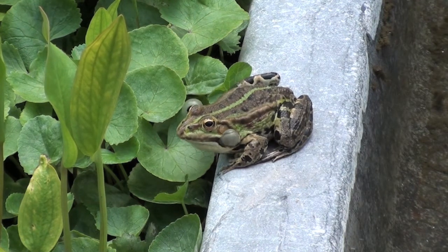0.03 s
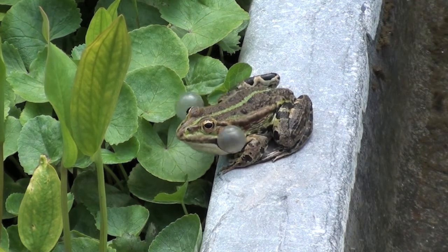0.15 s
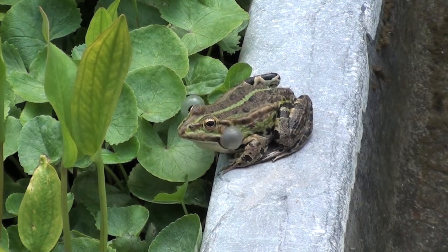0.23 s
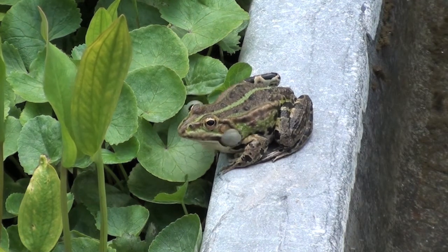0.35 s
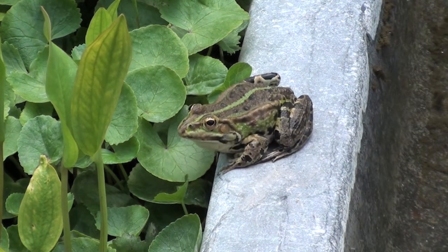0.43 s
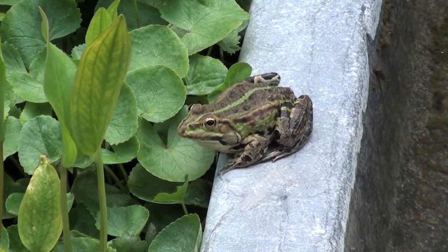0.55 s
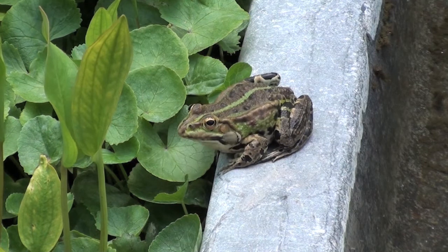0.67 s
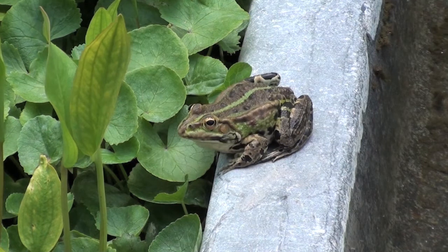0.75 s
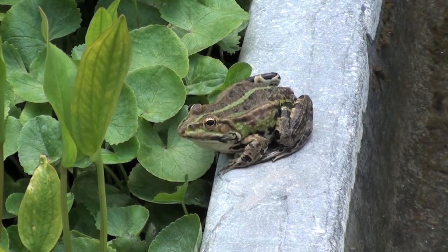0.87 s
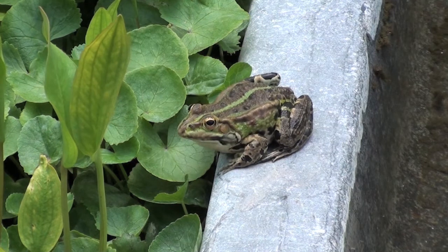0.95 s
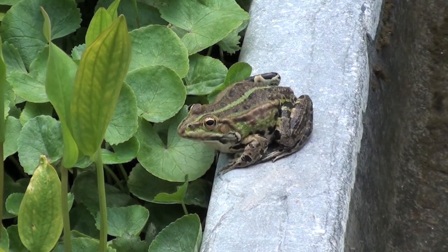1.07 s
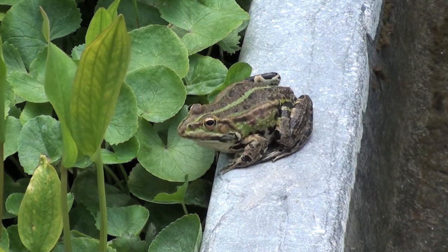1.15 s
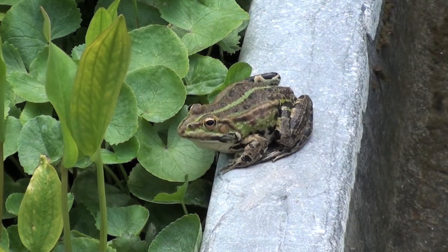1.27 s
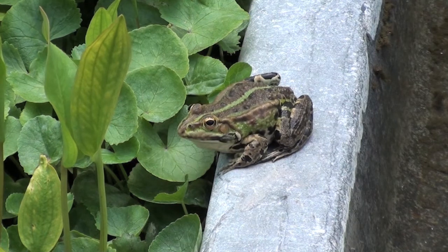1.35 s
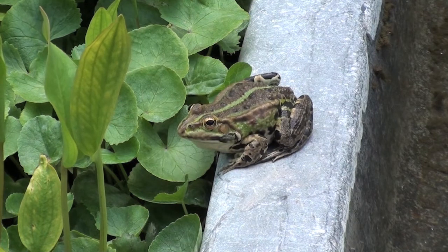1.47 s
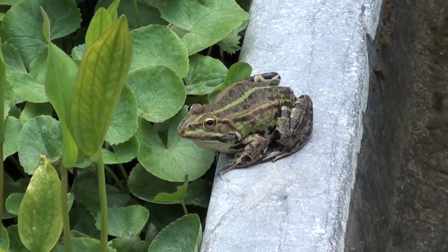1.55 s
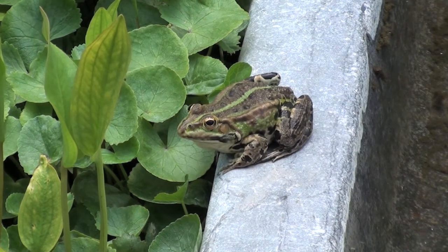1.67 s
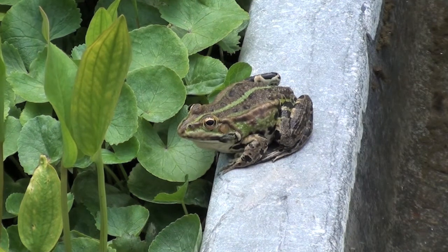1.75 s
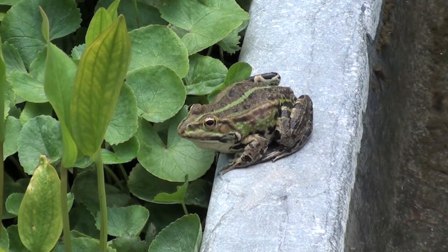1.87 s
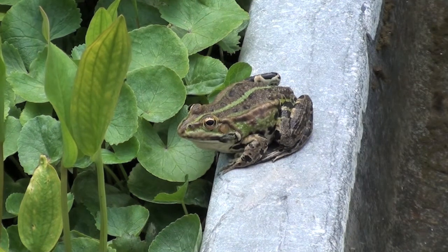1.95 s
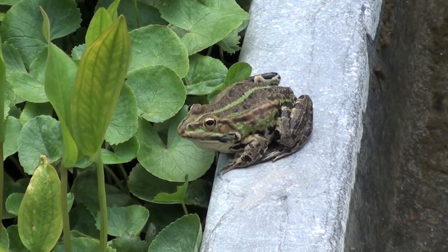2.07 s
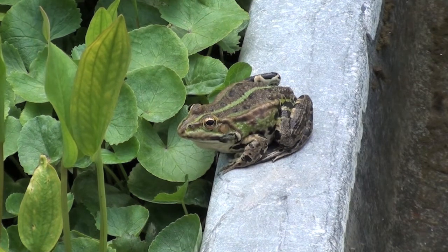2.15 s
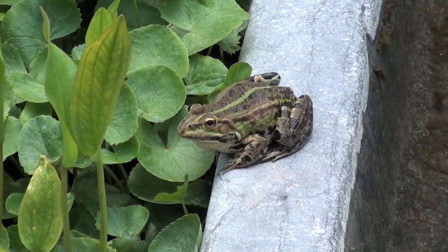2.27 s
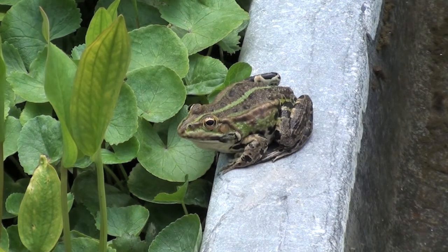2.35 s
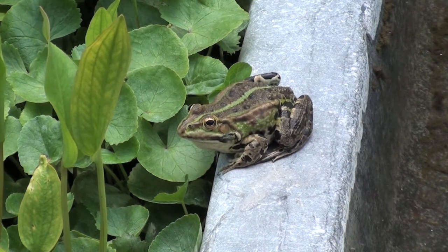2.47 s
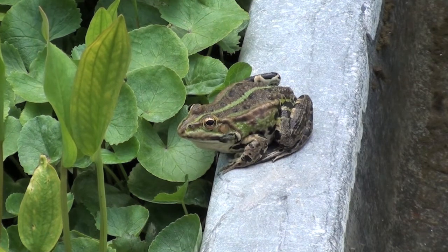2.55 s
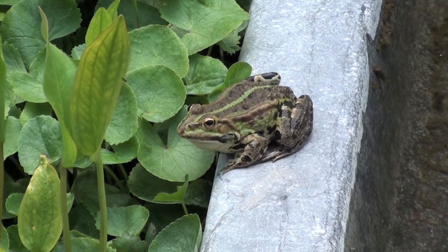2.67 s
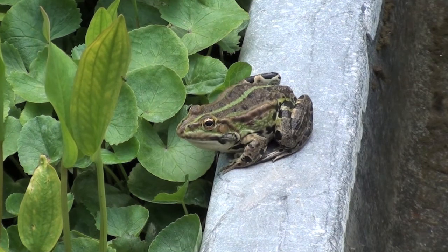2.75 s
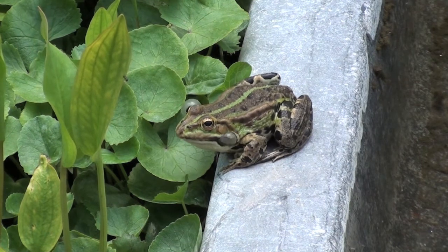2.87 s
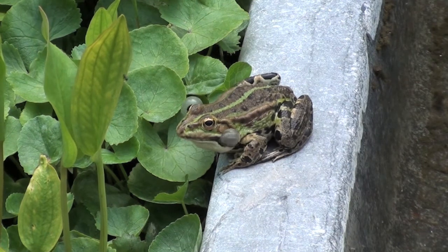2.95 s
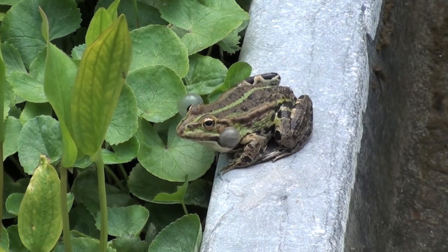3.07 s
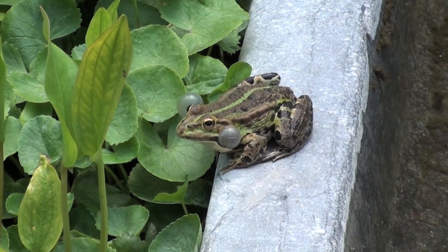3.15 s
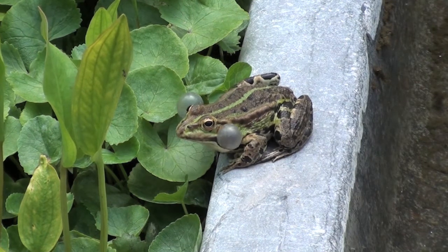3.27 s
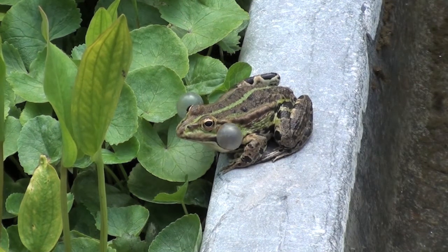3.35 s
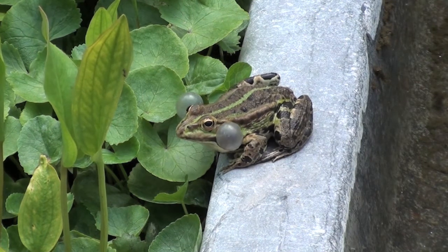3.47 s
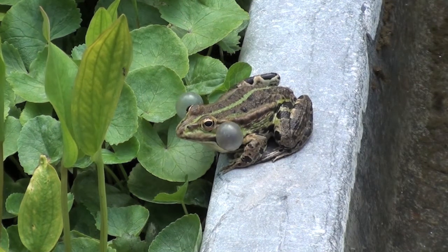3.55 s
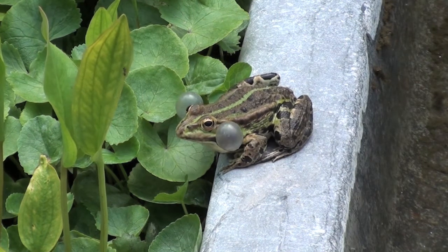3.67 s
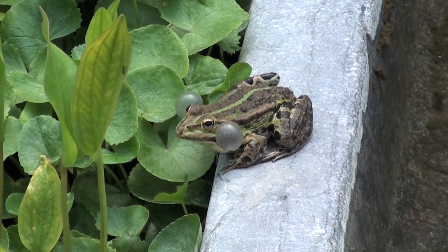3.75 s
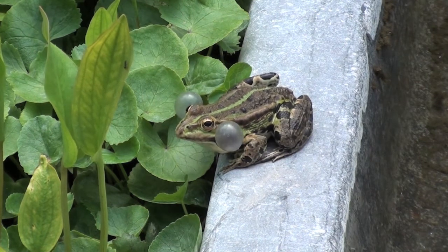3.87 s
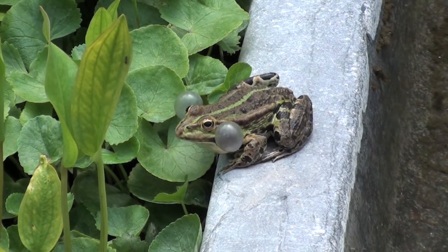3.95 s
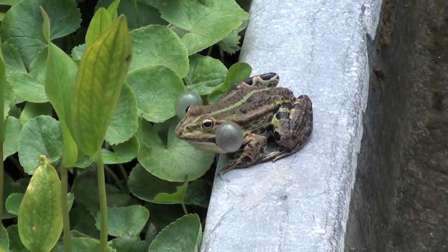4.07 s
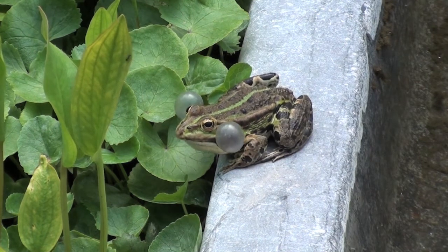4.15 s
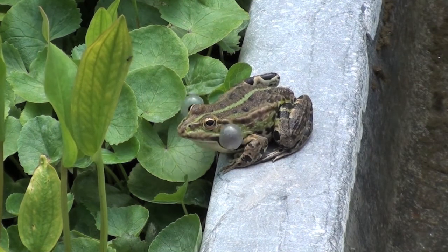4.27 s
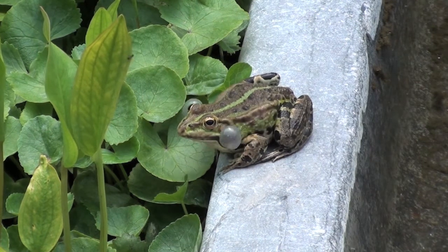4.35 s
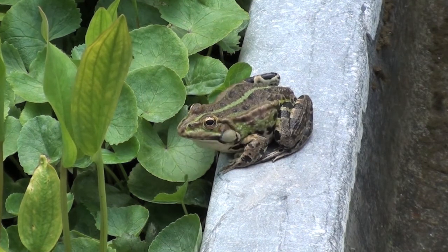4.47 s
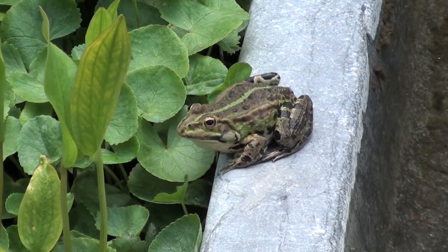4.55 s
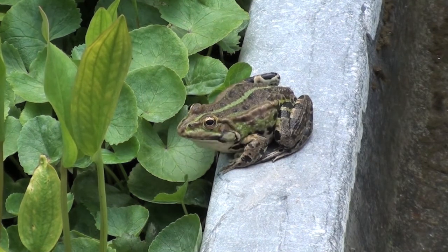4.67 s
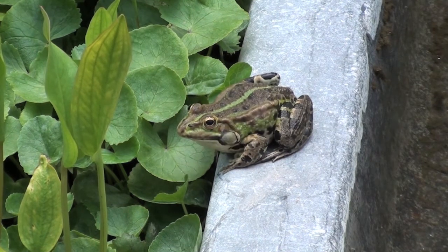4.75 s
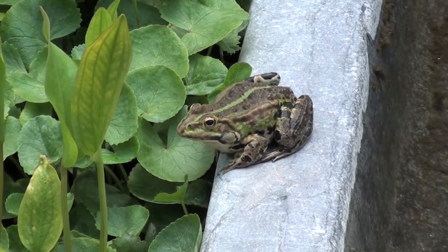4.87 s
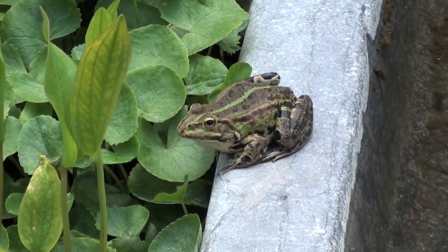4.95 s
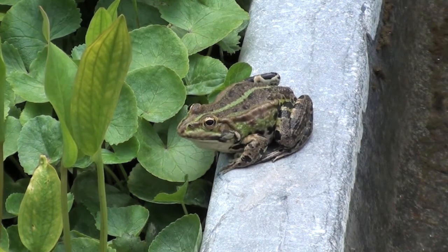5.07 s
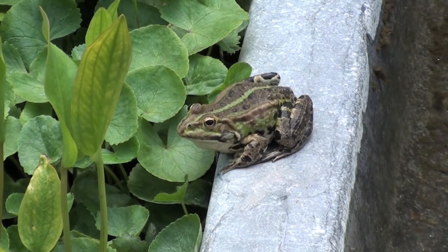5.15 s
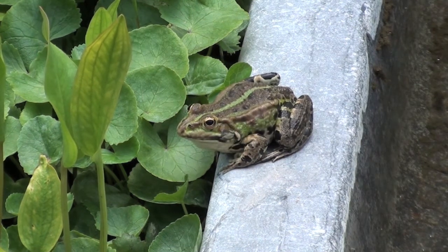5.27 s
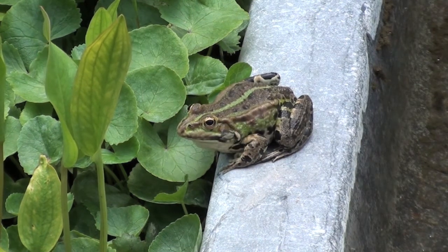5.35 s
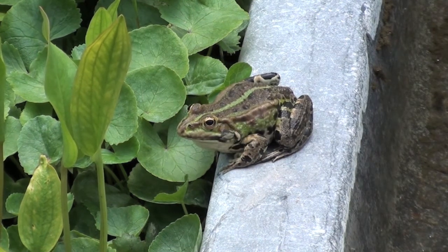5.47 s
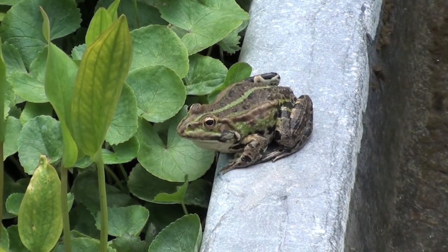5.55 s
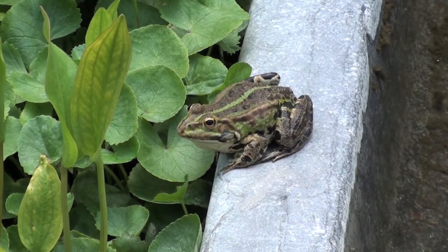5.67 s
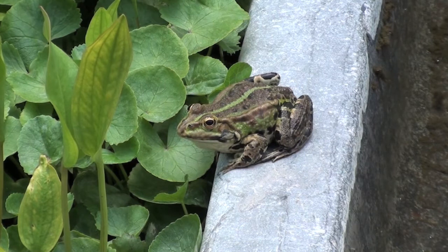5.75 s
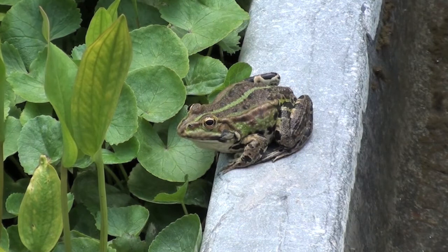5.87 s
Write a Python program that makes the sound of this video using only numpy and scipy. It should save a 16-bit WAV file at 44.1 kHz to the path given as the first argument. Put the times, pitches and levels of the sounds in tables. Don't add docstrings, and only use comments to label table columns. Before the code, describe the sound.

Outdoor pond edge in stereo, with low distant hum, hiss and very faint birds. One frog, near and centred, makes a brief rising croak, later accelerating clicks into a hard, bright rattle of over a second. Another frog, farther off to the left and more reverberant, rattles before, during the quiet gap and after it. Two small throaty grunts close the scene. Hard walls give quick slaps and short reverberation.

```python
import sys
import numpy as np
from scipy import signal
from scipy.fft import rfft, irfft, next_fast_len
from scipy.io import wavfile
from scipy.ndimage import uniform_filter1d, minimum_filter1d

SR = 44100
rng = np.random.default_rng(int(sys.argv[2]) if len(sys.argv) > 2 else 0)


def gain_from_decibels(decibels):
    exponent = np.asarray(decibels, float) / 20
    return 10 ** exponent


def materialize(psi):
    bounded = np.clip(np.atleast_2d(psi).T, -1, 1)
    quanta = np.round(bounded * 32767).astype(np.int16)
    wavfile.write(sys.argv[1], SR, quanta)


N = 260631

# (pitch_hz, width_hz, level_db)
THROAT_HOLLOWS = [(651, 64, -1), (819, 68, -1.5), (1017, 293, 2.5), (1263, 56, -4), (1500, 26, -36),
                  (510, 180, -6.5)]


def along(points, hz):
    f, v = np.transpose(points)
    return np.interp(np.log(hz + 1), np.log(f + 1), v)


def filtered(x, response):
    m = next_fast_len(N + SR // 2)
    return irfft(rfft(x, m) * response(np.fft.rfftfreq(m, 1 / SR)), m)[..., :N]


def blunt(f, top_hz):
    return 1 / (1 + 1.3j * f / top_hz - (f / top_hz) ** 2)


def modes(table):
    def response(f):
        total = 0
        for k, (hz, width_hz, db) in enumerate(table):
            ring = 1j * f * SR / (2 * np.pi) / (hz * hz - f * f + 1j * f * width_hz)
            total = total + (-1) ** k * gain_from_decibels(db) * ring
        return total
    return response


def clicks(s, db):
    return np.bincount(np.round(s * SR).astype(int), gain_from_decibels(db), N)[:N]


def rings(s, hz, db, rise_s, t60_s):
    t = np.arange(int(np.max(t60_s) * SR)) / SR
    swell = (1 - np.exp(-t / np.c_[rise_s])) ** 2
    fade = gain_from_decibels(np.c_[db] - 60 * t / np.c_[t60_s])
    tone = np.sin(2 * np.pi * np.c_[hz] * t)
    at = np.round(s * SR).astype(int)[:, None] + np.arange(len(t))
    return np.bincount(at.ravel(), (swell * fade * tone).ravel(), N)[:N]


def tones(rows):
    s, hz, db, rise_ms, t60_ms = np.transpose(rows)
    return rings(s, hz, db + 14.5, rise_ms / 1000, t60_ms / 1000)


def burst_pulses(rows, step_ms, count):
    s, db, gap_ms, close_db, slope_db = np.transpose(rows)
    back = np.arange(count)
    luck = rng.standard_normal((len(s), 2, count)) * (back > 0)
    lead_s = s[:, None] - back * step_ms / 1000 + .00025 * luck[:, 0]
    drop_db = slope_db[:, None] * np.minimum(back, 2.2) ** .75
    lead_db = db[:, None] - drop_db + .8 * luck[:, 1]
    return np.append(lead_s, s + gap_ms / 1000), np.append(lead_db, db + close_db)


def croak_pulses(rows):
    s, rate, db = np.transpose(rows)
    t = np.arange(s[0], s[-1], 1 / SR)
    turns = np.cumsum(np.interp(t, s, rate)) / SR
    at = np.interp(np.arange(int(turns[-1]) + 1), turns, t)
    luck = rng.standard_normal((len(at), 2))
    return at + 0.00017 * luck[:, 0], np.interp(at, s, db) + 0.65 * luck[:, 1]


def air():
    # (pitch_hz, level_db per Hz)
    colour = [(15, -44), (30, -11), (195, -2), (620, -6), (1070, -7), (1900, -9.5), (3300, -13.5),
              (15900, -20.5)]
    # (pitch_hz, likeness 0 to 1)
    alike = [(30, 0.996), (100, 1), (290, 0.82), (640, 0.37), (1410, 0.3), (3100, 0.46), (6820, 0.9),
             (9000, 0.99)]
    z = signal.stft(rng.standard_normal((2, N)), nperseg=512)[2]
    patches = uniform_filter1d(rng.standard_normal(z.shape[1:]), 5, axis=0)
    patches = uniform_filter1d(patches, 14, axis=1)
    pair = signal.istft(z * gain_from_decibels(0.81 * patches / patches.std()), nperseg=512)[1][:, :N]

    def mid_and_side(f):
        turn = np.arccos(np.clip(along(alike, f), -1, 1)) / 2
        return gain_from_decibels(along(colour, f)) * [np.cos(turn), np.sin(turn)]

    mid, side = filtered(pair, mid_and_side)
    return gain_from_decibels(-53) / mid.std() * np.array([mid + side, mid - side])


def birds():
    # (start_s, pitch_hz, peak_db, rise_ms, t60_ms)
    calls = [(.003, 7150, -48.5, 1.7, 19), (2.325, 5600, -56, 15, 110), (4.01, 479, -46.5, 42, 360),
             (4.12, 461, -56, 24, 490), (4.27, 413, -44, 39.5, 190), (4.86, 6620, -53, 12.2, 86),
             (5.0, 6500, -60, 15, 110), (5.055, 6560, -54, 12, 81), (5.14, 6750, -60, 20, 160),
             (5.36, 6360, -64, 36, 170), (5.8, 2060, -61, 35, 240)]
    return tones(calls)


def frog_pulses():
    # (time_s, pulses per s, peak_db)
    croaks = [
        [(.004, 198, -39.5), (.06, 205, -26.5), (.105, 253, -15.5), (.145, 225, -9.5), (.187, 188, -10.5),
         (.197, 316, -8.5), (.206, 310, -5), (.213, 280, -10), (.24, 230, -18)],
        [(2.9763, 165, -21), (3.0, 150, -29), (3.02, 150, -23), (3.045, 225, -35)],
        [(4.2168, 260, -13), (4.232, 259, -7), (4.2445, 340, -16)],
    ]
    # (start_s, peak_db)
    lone_clicks = [(2.684, -44), (2.798, -36), (2.874, -29), (2.913, -25), (2.9235, -21), (2.9445, -20),
                   (2.9545, -20), (2.967, -21), (3.0845, -24), (4.2045, -9), (4.212, -13)]
    # (strong pulse start_s, peak_db, gap to closing pulse in ms, closing pulse over strong in dB)
    rattle = [(3.068, -20, 5.2, -1), (3.107, -20, 6, -1), (3.154, -21, 5.9, 1), (3.195, -17, 6.8, 0),
              (3.237, -15, 10.4, -4), (3.2825, -13, 10, -12), (3.3225, -13, 10.9, -5), (3.363, -15, 6.4, 2),
              (3.4055, -11, 9.2, 0), (3.453, -10, 8, -9), (3.493, -8, 11.1, -8), (3.537, -9, 12.8, -6),
              (3.579, -7, 10, -12), (3.624, -7, 8, -9), (3.6645, -6, 10, -1), (3.705, -8, 6.9, 2),
              (3.750, -10, 7.8, 4), (3.7935, -7, 9.3, 1), (3.8355, -7, 7.5, 0), (3.8805, -7, 7.2, 1),
              (3.924, -6, 7.3, 0), (3.9675, -6, 7.4, 0), (4.0105, -10, 6.3, 4), (4.0535, -7, 6.7, 2),
              (4.101, -8, 6.1, 2), (4.145, -7, 6.1, 1), (4.188, -5, 6, -2)]
    strong_s, strong_db = np.transpose(rattle)[:2]
    slope_db = 6.5 + 0.19 * strong_db
    open_ms = np.minimum(8.3 + 1.3 * (strong_db + 21), 13)
    opens = strong_s - open_ms / 1000
    pulses = np.array(burst_pulses(np.c_[rattle, slope_db], step_ms=4.4, count=4))
    burst = np.minimum(np.searchsorted(strong_s, pulses[0] - .002), len(opens) - 1)
    early = (pulses[0] < opens[burst] - .001) & (pulses[0] > opens[burst] - .006)
    parts = [pulses[:, ~early], np.transpose(lone_clicks)]
    s, db = np.hstack(parts + [croak_pulses(c) for c in croaks])
    return s - .0004, db, opens, strong_db


def frog_skin(s, db, skin_hz, skin_db, throat_db):
    # (multiple of the group's pitch, level_db, t60_ms)
    skin_rings = [
        [(1, 1.5, 5.76), (.995, -13, 32), (.86, -8.5, 19.6), (1.11, -27, 55), (1.25, -7, 3.5), (1.42, -54, 4.9)],
        [(1.59, -9.5, 17), (1.75, -11.5, 5.7)],
        [(2.22, -9.5, 12.4), (2.52, 3, 7.8)],
    ]
    # (time_s, pitch ratio)
    squeak_drift = [(3.2, 1.05), (3.6, 1.02), (4.0, 1), (4.22, 1.01)]
    whistle_db = 8 + 3.9 * skin_db
    squeak_db = -28 - 0.0039 * np.maximum(skin_hz - 4690, 0) - 1.3 * (throat_db + 16)
    squeak_hz = 4620 * np.interp(s, *np.transpose(squeak_drift))
    one = np.ones(len(s))
    out = np.zeros(N)
    pitches, levels = (skin_hz, skin_hz, squeak_hz), (skin_db, whistle_db, squeak_db)
    for group, group_db, pitch in zip(skin_rings, levels, pitches):
        for ratio, level_db, t60_ms in group:
            luck = rng.standard_normal((len(s), 2))
            hz = ratio * pitch * (1 + .009 * luck[:, 0])
            size_db = db + group_db + level_db + 0.73 * luck[:, 1]
            out = out + rings(s, hz, size_db, 0.00041 * one, t60_ms / 1000 * one)
    return out


def frog():
    # (time_s, sac pitch_hz, skin pitch_hz, throat_db, skin_db), both dB over the sac
    swelling = [
        [(0, 1350, 5640, 11, -0.5), (.048, 1370, 5300, 8, -18), (.098, 1790, 5050, -0.5, -14.5),
         (.15, 2070, 5030, -10.5, -7), (.2, 2010, 4720, -12.5, -8), (.218, 2060, 4830, 0.5, -45),
         (.25, 1960, 4870, -3.5, -49)],
        [(2.68, 2280, 5300, 6.5, -47), (2.875, 2050, 5220, 12, -23), (2.925, 2030, 5300, 6.5, -13.5),
         (2.97, 1740, 5060, 4, -10), (3.02, 1930, 4950, -2, -27)],
        [(3.11, 2170, 4680, -8, -21), (3.22, 2475, 4700, -11, -14.5), (3.34, 2670, 4560, -11, -11.5),
         (3.45, 2760, 4550, -14.5, -11.5), (3.9, 2674, 4690, -17.5, -8.5), (4.2, 2370, 4727, -19, -7.5),
         (4.223, 2180, 4670, -6, -8.5), (4.245, 2170, 4800, -7, -26)],
    ]
    # (pitch_hz, width_hz, level_db)
    ledge = [(1855, 40, -5), (3340, 60, -5), (3660, 70, -10), (3950, 60, -9)]
    soft_hz = 4500
    s, db, opens, strong_db = frog_pulses()
    when, *columns = np.vstack(swelling).T
    sac_hz, skin_hz, throat_db, skin_db = (np.interp(s, when, c) for c in columns)
    pitch_luck, fade_luck, throat_luck, skin_luck = rng.standard_normal((4, len(s)))
    one, each = np.ones(len(s)), np.ones(len(opens))

    sac = rings(s, sac_hz * (1 + .04 * pitch_luck), db + 3, .0001 * one, .0078 * gain_from_decibels(fade_luck))
    snap_db = -1.5 + 0.54 * db
    snap = rings(s, 1.15 * sac_hz, db + snap_db, .00008 * one, .0025 * one)
    hum_hz = 1.06 * np.interp(opens, when, columns[0])
    hum = rings(opens, hum_hz, -20 + 0.3 * strong_db, 0.0008 * each, 0.038 * each)
    out = filtered(hum - sac - snap, lambda f: blunt(f, soft_hz))

    throat_pulses = clicks(s, db + throat_db - 8.5 + throat_luck)
    out = out - filtered(throat_pulses, lambda f: modes(THROAT_HOLLOWS)(f) / (1 + 1j * f / 2500))
    out = out + filtered(clicks(s, db + skin_db - 11.5 + 2 * skin_luck), modes(ledge))
    out = filtered(out, lambda f: blunt(f, 1.01 * soft_hz))
    out = out + frog_skin(s, db, skin_hz, skin_db, throat_db)

    def small_body(f):
        x = f / 580
        return ((1j * x) ** 2 / (1 + 1.1j * x - x ** 2)) ** 3

    return filtered(out, small_body)


def wall_echoes(x):
    # (delay_ms, level_db)
    walls = [(3.8, -12), (8.1, -9.5), (13, -37), (19, -17.5)]
    return filtered(x, lambda f: sum(gain_from_decibels(db) * np.exp(-2j * np.pi * f * ms / 1000) for ms, db in walls))


def pond(x, count=24):
    # (pitch_hz, t60_s)
    fading = [(400, 0.36), (1000, 0.43), (2200, 0.33), (5000, 0.37), (9000, 0.31)]
    # (pitch_hz, share of left-right difference)
    width = [(500, 0.11), (2500, 0.3), (5000, 0.028), (8000, 0.054), (12000, .04)]
    out, step = np.zeros((2, N + SR)), N // count + 1
    for start in range(0, N, step):
        hz, t, z = signal.stft(rng.standard_normal((2, SR // 2)), SR, nperseg=256)
        z[1] *= along(width, hz)[:, None]
        fade = gain_from_decibels(-60 * t / along(fading, hz)[:, None])
        mid, side = signal.istft(z * fade, SR, nperseg=256)[1]
        tail = np.array([mid + side, mid - side]) / np.linalg.norm(mid)
        wet = signal.fftconvolve(x[None, start:start + step], tail, axes=1)
        out[:, start + 300:][:, :wet.shape[1]] += wet
    return out[:, :N]


def neighbour():
    # (first burst start_s, end_s, gap between bursts in ms)
    rattles = [
        (.279, 1.28, 40.5),
        (1.523, 2.76, 41.1),
        (4.3, 5.4, 39.7),
    ]
    # (time_s, peak_db, sac pitch_hz, skin_db over the sac)
    calls = [
        [(.3, -25.5, 2041, -12), (.65, -27.5, 2430, -3.5), (.95, -28.5, 2170, -1.5), (1.01, -24, 2310, -9.5),
         (1.06, -35.5, 2380, -10), (1.17, -42, 2050, -8), (1.27, -47, 2100, -16)],
        [(1.3, -31, 2460, -8), (1.5, -34, 2290, -11), (1.53, -29.5, 2530, -5.5), (2.0, -29, 2494, -3.5),
         (2.19, -26, 2205, -7.5), (2.27, -43.5, 2270, -27), (2.45, -39, 2330, -28), (2.6, -51, 2200, -28),
         (2.75, -47, 2260, -29)],
        [(4.3, -29.5, 2527, -3.5), (4.8, -31.5, 2475, 0), (5.088, -27.5, 2500, -3), (5.14, -23.5, 2150, -9.5),
         (5.18, -30, 2300, -17), (5.27, -44, 2260, -10), (5.4, -55, 2300, -9)],
    ]
    # (start_s, peak_db)
    opening_clicks = [(1.2999, -36.5), (1.3783, -34), (1.4152, -34), (1.4518, -32.5), (1.4838, -35.5),
                      (1.5187, -35)]
    # (pitch_hz, width_hz, level_db)
    low_skin = [(1690, 160, -28), (3230, 490, -9.5), (3984, 183, -5.5)]
    when, effort_db, sac_hz, skin_db = np.vstack(calls).T
    s = np.hstack([np.arange(first, end, gap_ms / 1000) for first, end, gap_ms in rattles])
    luck = rng.standard_normal((len(s), 3))
    db = np.interp(s, when, effort_db) + 1.43 * luck[:, 0]
    s = s + 0.0022 * luck[:, 1]
    gap_ms = 7 + 1.3 * luck[:, 2]
    rows = np.c_[s + .004, db - 3, gap_ms, 0 * s - 2, 0 * s + 2.5]
    bursts = burst_pulses(rows, step_ms=4.4, count=4)
    s, db = np.hstack([bursts, np.transpose(opening_clicks) + [[0], [3]]])
    lone = np.arange(len(s)) >= len(bursts[0])
    one = np.ones(len(s))

    skin_pulse_db = db + np.interp(s, when, skin_db)
    skin = filtered(clicks(s, skin_pulse_db + 0.5), modes(low_skin))
    top_hz = 4700 * (1 + 0.068 * np.exp(-(s - rattles[0][0]) / 0.22))
    skin = skin - rings(s, top_hz, skin_pulse_db - 1, .0001 * one, 0.015 * one)
    throat_db = -30.5 - 0.55 * (np.interp(s, when, effort_db) + 29.5) + 10 * lone
    throat = filtered(clicks(s, db + throat_db), modes(THROAT_HOLLOWS))
    hz = np.interp(s, when, sac_hz) * (1 + .018 * rng.standard_normal(len(s)))
    sac = rings(s, hz, db, 0.0001 * one, 0.013 * one)

    def bounce(f):
        late = np.exp(-2j * np.pi * f * .00283)
        return 1 + .7 * late + .3 * late ** 2

    def reeds(f):
        return 1 / (1 + (1j * f / 5100) ** 2 + 1.2j * f / 5100) ** 2

    return filtered(filtered(0.25 * sac + skin + throat, bounce) + 0.69 * sac, reeds)


def grunts():
    # (start_s, pitch_hz, peak_db, rise_ms, t60_ms)
    grunt_tones = [
        (5.597, 1130, -46, 8, 70),
        (5.608, 660, -25, 6, 34),
        (5.625, 610, -37, 5, 50),
        (5.649, 630, -32, 6, 55),
        (5.685, 620, -48, 12, 200),
        (5.635, 1130, -52, 8, 70),
        (5.882, 1100, -52, 8, 60),
        (5.8655, 630, -31, 4, 30),
        (5.884, 560, -34, 5, 32),
        (5.902, 600, -33, 4, 35),
    ]
    return tones(grunt_tones)


def scene():
    near, far, soft = frog(), neighbour(), grunts()
    out = (near + wall_echoes(near)) * gain_from_decibels([[.2], [-.2]]) + gain_from_decibels(-7) * pond(near)
    out = out + (gain_from_decibels(-1) * far + gain_from_decibels(1.5) * pond(far)) * gain_from_decibels([[2.1], [-2.1]])
    out = out + (soft + gain_from_decibels(-12) * pond(soft)) * gain_from_decibels([[.8], [-.8]])
    return out + birds() + air()


def low_pass(x):
    return signal.sosfilt(signal.butter(12, 17030, fs=SR, output="sos"), x)


def record(dry):
    need = np.minimum(1, .66 / (np.abs(dry).max(0) + 1e-9))
    gain = uniform_filter1d(minimum_filter1d(need, size=161), size=81)
    mix = filtered(dry * gain, lambda f: f < 15800)
    return low_pass(mix)


dry = scene()
out = record(dry)
materialize(out)
```